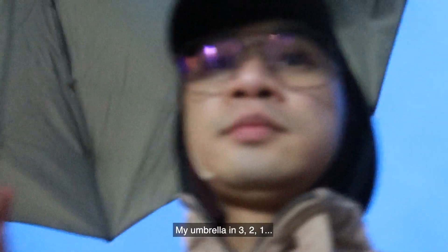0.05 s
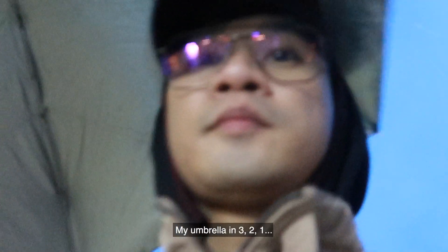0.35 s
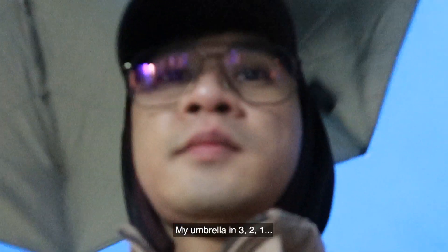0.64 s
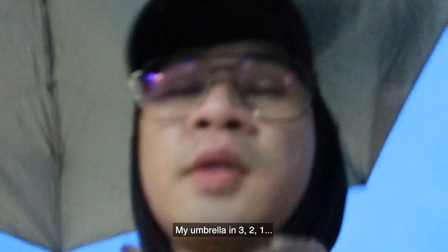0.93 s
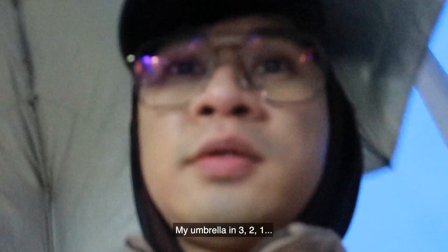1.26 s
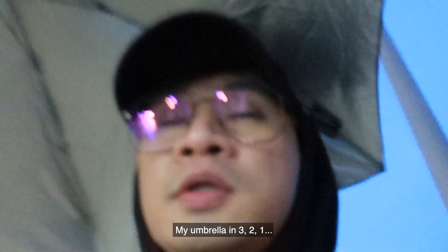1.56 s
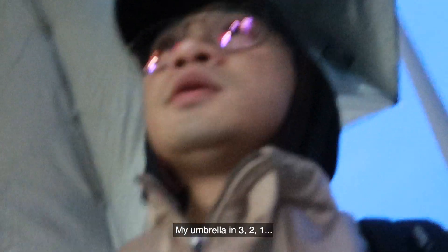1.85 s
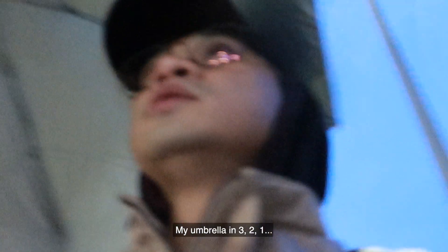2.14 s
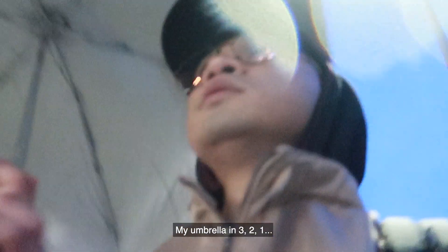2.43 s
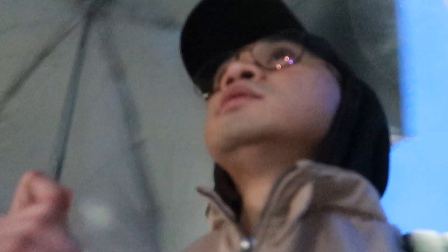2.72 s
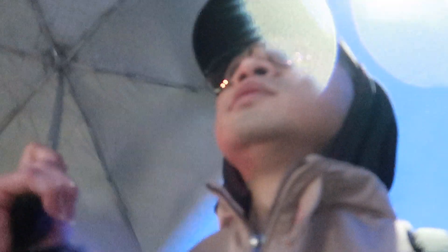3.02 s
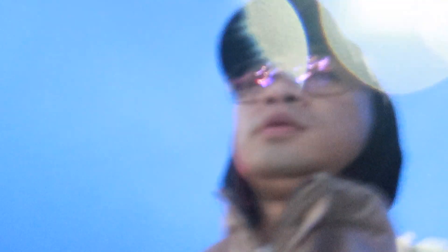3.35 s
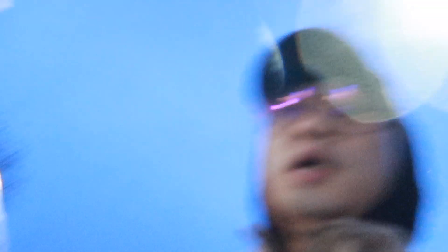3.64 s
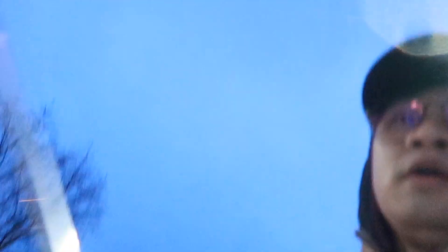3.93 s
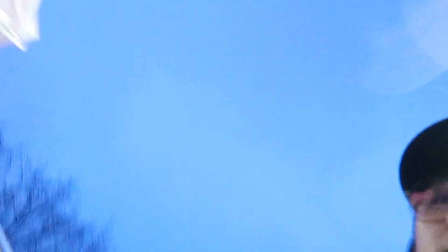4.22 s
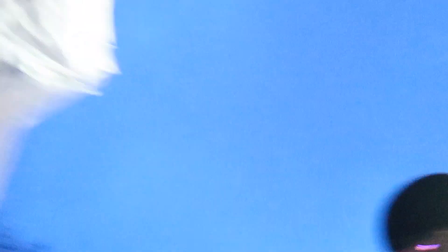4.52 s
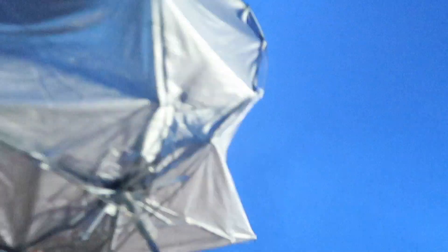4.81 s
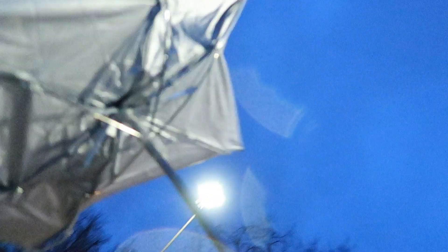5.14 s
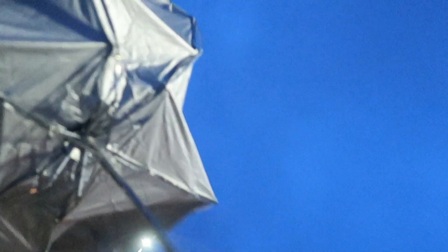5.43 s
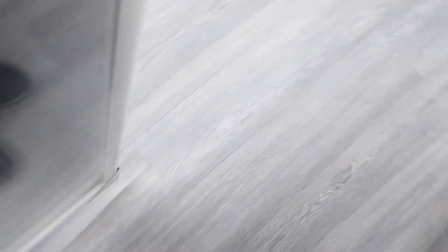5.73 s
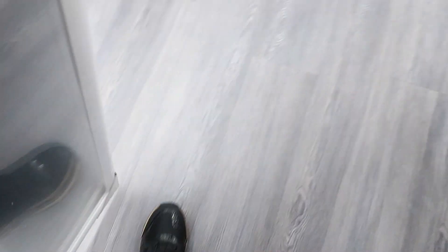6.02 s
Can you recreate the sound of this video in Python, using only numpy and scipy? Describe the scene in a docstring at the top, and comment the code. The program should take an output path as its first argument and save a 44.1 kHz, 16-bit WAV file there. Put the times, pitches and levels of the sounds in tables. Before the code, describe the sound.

Loud rumbling gusts, snapping umbrella cloth and raindrop ticks on a wet street stop abruptly, leaving soft indoor hum and a scuffing shoe.

```python
"""Umbrella on a wet, windy street

Turbulent gusts buffet the microphone of a phone held under an umbrella and snap the canopy. Tyres roar
and throw up spray; the frame and raindrops tick close by. Each hard flap makes the gain control duck
the street, which then creeps back. The street stops dead, and after a moment's silence a quiet room
hums, where a shoe scuffs the floor by friction."""
import sys
import numpy as np
from scipy import signal
from scipy.fft import rfft, irfft, next_fast_len
from scipy.io import wavfile
from scipy.ndimage import uniform_filter1d

SR = 44100
rng = np.random.default_rng(int(sys.argv[2]) if len(sys.argv) > 2 else 0)


def persist_wave(psi):
    """Save psi, clipped to +-1, as 16-bit WAV."""
    counts = np.round(np.clip(psi, -1, 1) * 32767).astype(np.int16)
    wavfile.write(sys.argv[1], SR, np.atleast_2d(counts).T)


N = 272141
TIME = np.arange(N) / SR
STREET_ENDS_S, ROOM_STARTS_S = 5.498, 5.552

# noise spectra: f/Hz, relative spectral density/dB
RUMBLE_SPECTRUM = [(20, -51), (45, -37.5), (110, -10.5), (190, -3), (330, 0), (450, -2), (650, -11.5),
                   (1000, -20.5), (2000, -52), (5000, -67.5)]
SHUDDER_SPECTRUM = [(20, -25.5), (45, -8.5), (80, -0.5), (130, 0.5), (220, -2), (500, -50)]
RASP_SPECTRUM = [(200, -17), (450, 6.5), (750, 7.5), (1250, 3), (1800, -5.5), (2600, -16), (4000, -30.5),
                 (7000, -63.5), (12000, -71.5)]
ROAR_SPECTRUM = [(60, 1), (200, 9), (600, -3.5), (1000, 2.5), (1700, 2), (2100, 0), (2500, -3.5),
                 (3200, -20.5), (4500, -56.5), (8000, -48.5)]
SPRAY_SPECTRUM = [(1500, -21), (2800, 4), (4000, -2), (5200, -3.5), (6500, -11), (8000, -3.5),
                  (10000, -27.5), (14000, -43)]
MIST_SPECTRUM = [(4000, -20), (6500, 0), (8000, 1.5), (9200, 2), (10700, -1), (12500, -1), (14500, -20)]
SWISH_SPECTRUM = [(2000, -24.5), (3500, 0.5), (5200, -2), (8000, -36)]
VENTILATION_SPECTRUM = [(25, -4), (70, 5), (140, 0.5), (270, 1.5), (450, -6.5), (1000, -15), (2400, -19),
                        (4000, -23), (7000, -23), (11000, -29.5), (14500, -53)]
SCUFF_SPECTRUM = [(300, -13), (700, -11), (900, -7), (1080, 5), (1450, -14), (1850, -13), (2130, -8),
                  (2500, -20), (3500, -21.5), (6000, -19), (11000, -31), (14500, -35)]
# stereo width: f/Hz, side minus mid/dB
WIND_WIDTH = [(100, -52.5), (250, -34), (500, -18), (1000, -8), (2000, 1.5), (4000, 4.5), (7000, 8.5),
              (9000, 17.5)]
STREET_WIDTH = [(100, -54), (500, -42), (1200, -25.5), (2000, -20), (3000, -6), (5000, 4), (6500, 3),
                (8500, 40)]
ROOM_WIDTH = [(80, -30), (400, -11), (1000, -10.5), (5000, -4), (10000, 7)]
# imbalance of the microphone pair: f/Hz, left minus right/dB
MIC_BALANCE = [(700, 0), (1500, -1), (3300, -3.3), (6000, -1.5), (9000, 0)]
# gusts across the microphone: t/s, duration/s, level/dB
GUSTS = [(0, 0.052, -19), (0.06, 0.086, -17), (0.196, 0.21, -16), (0.421, 0.16, -23.5), (0.617, 0.059, -21),
         (0.858, 0.038, -16.5), (0.991, 0.11, -14), (1.124, 0.081, -20), (1.232, 0.19, -15.5),
         (1.628, .12, -20), (1.829, 0.073, -22), (2.078, 0.12, -26.5), (2.294, 0.2, -16),
         (2.509, 0.098, -15), (2.655, 0.077, -13), (2.808, 0.13, -27), (2.974, 0.1, -18.5),
         (3.112, 0.053, -15), (3.403, 0.022, -23), (3.514, 0.029, -16.5), (3.579, 0.046, -22),
         (3.797, 0.013, -17.5), (3.889, 0.047, -21.5), (4.066, 0.023, -19.5), (4.205, 0.17, -28.5),
         (4.346, 0.11, -19), (4.523, 0.047, -22.5), (4.601, 0.21, -20), (4.835, 0.085, -12.5),
         (4.973, 0.044, -14), (5.118, 0.091, -20.5), (5.277, 0.18, -18.5)]
# deep shudder, stronger once the phone is out in the open: t/s, level re rumble/dB
SHUDDER_LEVEL = [(0, -28), (0.6, -22), (1.5, -35), (2.6, -34), (3.1, -10), (4.6, -9), (5.5, -12)]
# tyres as cars come and go: t/s, relative roar level/dB, relative spray level/dB
TYRE_LEVELS = [(0, -36.5, -46.5), (0.65, -34.5, -44), (1.1, -31.5, -41.5), (1.5, -30.5, -42),
               (2.25, -26.5, -36), (2.5, -29.5, -35), (2.95, -26.5, -30.5), (3.2, -30, -38),
               (3.5, -33, -42), (3.76, -29.5, -41), (3.87, -35, -35.5), (4.25, -34.5, -37),
               (4.7, -40, -42.5), (5.25, -36, -48.5), (5.49, -47, -47.5)]
# fine mist behind the nearest cars: t/s, level/dB
MIST_LEVEL = [(0, -59), (.65, -52), (1.1, -47.5), (2.2, -39.5), (3.1, -47.5), (3.6, -55), (3.9, -56),
              (4.2, -48), (4.7, -62)]
# reflection in the moving canopy: t/s, delay/s, amplitude as a share of the direct sound
CANOPY_ECHO = [(0, 0.002, .2), (.7, 0.0022, .2), (1.2, 0.00162, .28), (1.6, 0.0021, .28),
               (1.85, 0.0025, .26), (2.25, 0.002, .3), (2.45, 0.0021, .05), (3.52, .0013, .06),
               (3.68, 0.0013, .4), (4.3, 0.0014, .3), (4.8, 0.0015, .1)]
# strong eddies striking the microphone: t/s, peak level/dB
KNOCKS = [(0.2216, -13), (0.2402, -6), (0.3173, -4), (1.2998, -3), (1.876, -9.5), (2.1108, 0), (3.0269, -6),
          (4.459, -6.5), (4.643, -12), (4.741, -4.5), (4.9267, -12), (5.3792, -4)]
# snaps of cloth, ticks of frame and drops: t/s, peak level/dB, ring f/Hz, decay time/s
TICKS = [(0.238, -22.5, 5560, 0.0025), (0.784, 4.5, 3500, 0.001), (0.7883, -4.5, 3300, 0.0023),
         (0.536, -26, 6500, 0.0018), (1.145, -16.5, 6650, .0025), (2.1015, -34, 5400, 0.0025),
         (3.116, -11.5, 4700, 0.011), (3.2098, -10, 4400, .003), (3.21, -4.5, 9680, 0.0037),
         (3.2485, -16, 9700, .0043), (3.367, -16, 9700, 0.0018), (4.731, -29, 6940, 0.0013),
         (4.795, -9.5, 3920, 0.00083), (5.184, -25, 9050, 0.011), (5.221, -20.5, 6600, 0.023),
         (5.3288, -28, 9300, 0.0017)]
# canopy flaps: t/s, level/dB, rise time/s, crack minus thump/dB
FLAPS = [(0.263, -16.5, 0.011, -2.5), (0.504, -20.5, 0.012, -27), (0.654, -17.5, 0.0044, -4),
         (0.706, -15.5, 0.0085, -4.5), (0.778, -2, 0.0052, -2), (0.98, -11.5, 0.01, -10.5),
         (1.032, -14, 0.0032, -7), (1.131, -9.5, 0.0035, -9), (1.29, -11.5, 0.013, 3.5),
         (1.872, -15, 0.0024, -12), (2.099, -12.5, 0.0048, -17), (2.144, -9.5, 0.0044, -6.5),
         (2.316, -5.5, 0.0021, -1), (2.347, 1.5, 0.0087, 0), (2.383, -2, 0.0051, 13),
         (2.406, -10.5, 0.013, 4), (2.453, -7.5, 0.0051, 10), (2.584, -11, 0.009, -1.5),
         (2.749, -12, 0.0071, -1), (3.025, -2, 0.0088, 0), (3.067, -14.5, 0.0059, 5),
         (3.123, -10.5, 0.0046, -4), (3.308, -15.5, 0.0022, -21), (3.548, -17, 0.0069, -3.5),
         (4.098, -19, 0.0073, 4.5), (4.734, -13.5, 0.0064, -3), (4.784, -0.5, 0.0086, -1.5),
         (4.893, -7, 0.0043, -8), (4.924, -7.5, 0.0035, -7), (4.991, -11.5, 0.007, -0.5),
         (5.333, -1.5, 0.0041, -7.5), (5.376, -8.5, 0.003, -9), (5.412, -10, 0.01, -8),
         (5.489, -9.5, 0.0042, -3)]
# wind whistling on the ribs: t/s, duration/s, f/Hz, bandwidth/Hz, level/dB
WHISTLES = [(1.56, 0.13, 3220, 129, -39), (3.59, 0.24, 3430, 190, -37.5)]
# a bright swish that swells and passes: t/s, level/dB
SWISH_LEVEL = [(3.72, -86.5), (3.83, -42), (3.93, -48), (4.25, -32.5), (4.42, -48), (4.85, -61)]
# partials of a machine indoors: f/Hz, rms level/dB
HUM_PARTIALS = [(80.7, -46.5), (242.2, -51.5)]
# a sole brushing the floor: t/s, level/dB, rise time/s
SCUFFS = [(5.83, -56, 0.025), (6.02, -33.5, 0.013), (6.053, -50, 0.012), (6.12, -46, 0.0031)]
# squeaks and ticks of the sole: t/s, duration/s, f/Hz, bandwidth/Hz, level/dB
SQUEAKS = [(5.852, 0.011, 6300, 2000, -49), (5.84, 0.16, 2460, 56, -56), (6.12, 0.037, 4517, 220, -55)]


def from_db(db):
    """Amplitude ratio: a factor of ten for every 20 dB."""
    return 10 ** (np.asarray(db) / 20)


def unit_rms(x):
    """Normalisation to unit mean power."""
    return x / np.sqrt(np.mean(x ** 2) + 1e-20)


def in_time(rows):
    """Linear interpolation of each column to every sample."""
    times, *columns = np.transpose(rows)
    return [np.interp(TIME, times, column) for column in columns]


def at_hz(points, hz):
    """Interpolation on a logarithmic frequency axis."""
    knots, values = np.transpose(points)
    return np.interp(np.log(np.maximum(hz, 1)), np.log(knots), values)


def drift(rate_hz):
    """Low-passed Gaussian noise: a smooth fluctuation of unit rms."""
    pole = np.exp(-2 * np.pi * rate_hz / SR)
    smooth = signal.lfilter([1], [1, -2 * pole, pole * pole], rng.standard_normal(N + SR))
    return unit_rms(smooth[SR:])


def eddies(rate_hz):
    """Turbulent fluctuation, its extremes rounded by saturation."""
    return unit_rms(np.tanh(drift(rate_hz)))


def stereo_noise(spectrum, width):
    """Spectrally shaped noise of unit rms; independent mid and side parts set its width."""
    size = next_fast_len(N)
    hz = np.arange(size // 2 + 1) * SR / size
    spread, lean = from_db(at_hz(width, hz)), from_db(at_hz(MIC_BALANCE, hz) / 2)
    white = rfft(rng.standard_normal((2, size)))
    mid, side = white * from_db(at_hz(spectrum, hz)) / np.hypot(1, spread)
    left, right = (mid + spread * side) * lean, (mid - spread * side) / lean
    return unit_rms(irfft([left, right], size)[:, :N])


def evened(x, span_s):
    """Division by the running rms holds the power steady over spans longer than span_s."""
    size = int(span_s * SR)
    power = uniform_filter1d(uniform_filter1d(np.mean(x ** 2, axis=0), size), size)
    return x / np.sqrt(power + 1e-9)


def resonators(x, hz, width_hz, widening=1):
    """Two unity-gain resonators in cascade, the second wider by the factor widening."""
    for width in (width_hz, widening * width_hz):
        r = np.exp(-np.pi * width / SR)
        feedback = [1, -2 * r * np.cos(2 * np.pi * hz / SR), r * r]
        x = signal.lfilter(np.array([1, 0, -1]) * (1 - r * r) / 2, feedback, x + 1e-18)
    return x


def swell(t, rise_s):
    """Samples and envelope of a critically damped pulse: quick rise, slower decay."""
    start = int(t * SR)
    age = TIME[:min(int(10 * rise_s * SR), N - start)] / rise_s
    return slice(start, start + len(age)), age * np.exp(1 - age)


def noise_tone(t, length_s, hz, width_hz, db):
    """Narrow-band noise, heard as a pitch, under a half-sine envelope."""
    envelope = np.sin(np.pi * np.clip((TIME - t) / length_s, 0, 1))
    band = resonators(rng.standard_normal(N), hz, width_hz, widening=2)
    return from_db(db) * envelope * unit_rms(band)


def gusts(breeze_db=-33, attack_s=0.011, release_s=0.02, flutter_db=2.5):
    """The wind's envelope: gusts and a restless breeze add in power, and eddies modulate the sum."""
    power = from_db(breeze_db + 1.5 * drift(rate_hz=13)) ** 2
    for t, length_s, db in GUSTS:
        rise = np.clip((TIME - t) / attack_s, 0, 1)
        fall = np.exp(-np.clip((TIME - t - length_s) / release_s, 0, 20))
        power += (from_db(db) * rise * fall) ** 2
    return np.sqrt(power) * from_db(flutter_db * eddies(rate_hz=35))


def wind(rasp_db=-3, rasp_exponent=1.92, tatter_db=9.0, lumps_db=1.5, crest_exponent=0.61):
    """Turbulence rumbles in the microphone ports; rasp grows as a power law. Flaps share both noises."""
    strength = gusts()
    rasp_gain = from_db(rasp_db + tatter_db * eddies(rate_hz=33)) * strength ** rasp_exponent
    rumble = stereo_noise(RUMBLE_SPECTRUM, WIND_WIDTH) * from_db(lumps_db * drift(rate_hz=64))
    rumble = evened(rumble, span_s=0.023)
    shudder = from_db(in_time(SHUDDER_LEVEL)[0]) * stereo_noise(SHUDDER_SPECTRUM, WIND_WIDTH)
    crests = (0.5 + rumble[0] ** 2) ** (crest_exponent / 2)   # the flow tears mostly on pressure crests
    rasp = evened(stereo_noise(RASP_SPECTRUM, WIND_WIDTH) * crests, span_s=0.0059)
    buffeting = rumble + shudder
    return strength * buffeting + rasp_gain * rasp + flaps(buffeting, rasp)


def traffic(roar_db=4.5, spray_db=4.0, waver_db=1.5, spatter_db=1.53):
    """Rolling noise: tyres roar on the asphalt and fling up water as hissing spray and fine mist."""
    roar_gain, spray_gain = from_db(in_time(TYRE_LEVELS))
    roar_gain *= from_db(roar_db + waver_db * drift(rate_hz=14))
    roar = roar_gain * stereo_noise(ROAR_SPECTRUM, STREET_WIDTH)
    mist = from_db(in_time(MIST_LEVEL)[0]) * stereo_noise(MIST_SPECTRUM, STREET_WIDTH)
    spray = from_db(spray_db) * spray_gain * stereo_noise(SPRAY_SPECTRUM, STREET_WIDTH)
    return roar + (spray + mist) * from_db(spatter_db * drift(rate_hz=60))


def canopy_reflection(direct, band_hz=(500, 4200)):
    """Interference with the cloth's inverted echo forms a comb that slides as the umbrella moves."""
    delay_s, share = in_time(CANOPY_ECHO)
    reflected = signal.sosfiltfilt(signal.butter(2, band_hz, "band", fs=SR, output="sos"), direct)
    echo = np.array([np.interp(TIME - delay_s, TIME, channel) for channel in reflected])
    return (direct - share * echo) / np.hypot(1, share)


def knocks(centre_hz=(320, 600), top_hz=2400):
    """An eddy delivers one heavily damped pressure impulse: a steep edge and a swing back."""
    out, impulse = np.zeros(N), signal.unit_impulse(SR // 50)
    lowpass = signal.butter(2, top_hz, fs=SR)
    for t, db in KNOCKS:
        hz, start = rng.uniform(*centre_hz), int(t * SR)
        kick = signal.lfilter(*lowpass, resonators(impulse, hz, width_hz=hz))
        out[start:start + len(kick)] += from_db(db) * kick / np.abs(kick).max()
    return out


def ticks(body_ratio=0.46, body_db=24.0, thinning_db=20, ring_width_hz=3000, spread=0.8):
    """Impacts excite damped resonances: a dull, centred body and a bright ring above it."""
    out, age = np.zeros((2, N)), TIME[:SR // 20]
    lowpass = signal.butter(10, 12000, fs=SR, output="sos")
    for t, db, hz, decay_s in TICKS:
        burst = signal.sosfilt(lowpass, rng.standard_normal((2, len(age))) * np.exp(-age / decay_s))
        body_hz = body_ratio * hz
        body = resonators(burst[0], body_hz, width_hz=0.59 * body_hz)
        ring = resonators(burst[1], hz, ring_width_hz, widening=2)
        # slack cloth snaps low; hard parts tick high, with less body; the higher the tick, the wider its stereo
        # ring
        hardness = np.interp(hz, [4000, 7000], [0, 1])
        body_gain = from_db(body_db - thinning_db * hardness) * ring_width_hz / hz
        tick = body_gain * body + ring * np.array([[1], [-spread * hardness]])
        start = int(t * SR)
        out[:, start:start + len(age)] += from_db(db) * tick / np.abs(tick).max()
    return out


def flaps(thump, crack):
    """The flapping canopy displaces air: each pressure pulse is a swell of low and bright noise."""
    out = np.zeros((2, N))
    for t, db, rise_s, crack_db in FLAPS:
        span, envelope = swell(t, rise_s)
        burst = envelope * (thump[:, span] + from_db(crack_db) * crack[:, span])
        out[:, span] += from_db(db) * np.sqrt(np.mean(envelope ** 2)) * unit_rms(burst)
    return out


def gain_control(x, limit_db=-11.0, recovery_db_per_s=6, window_s=0.014, ahead_s=0.0017):
    """Limiting: a level over the threshold cuts the gain at once, and recovery is linear in decibels."""
    size = int(window_s * SR)
    power = np.abs(uniform_filter1d(np.mean(x ** 2, axis=0), size))
    excess_db = np.maximum(10 * np.log10(power + 1e-12) - limit_db, 0)
    recovered_db = recovery_db_per_s * TIME
    cut_db = np.maximum.accumulate(excess_db + recovered_db) - recovered_db
    cut_db = uniform_filter1d(cut_db, size // 2)
    return x * from_db(-np.interp(TIME + ahead_s, TIME, cut_db))


def rib_whistles():
    """Aeolian tones: air flowing past the ribs sounds in narrow bands."""
    return sum(noise_tone(*whistle) for whistle in WHISTLES)


def bright_swish():
    """A bright band of noise swells and passes."""
    return from_db(in_time(SWISH_LEVEL)[0]) * stereo_noise(SWISH_SPECTRUM, STREET_WIDTH)


def room_tone(ventilation_db=-43.0):
    """Superposition of a machine's steady partials and broadband ventilation noise."""
    hum = sum(from_db(db) * np.sqrt(2) * np.sin(2 * np.pi * (hz * TIME + rng.random()))
              for hz, db in HUM_PARTIALS)
    return hum + from_db(ventilation_db) * stereo_noise(VENTILATION_SPECTRUM, ROOM_WIDTH)


def shoe():
    """Sliding friction between sole and floor gives broadband scuffs and narrow-band squeaks."""
    out = np.zeros((2, N))
    friction = stereo_noise(SCUFF_SPECTRUM, ROOM_WIDTH)
    for t, db, rise_s in SCUFFS:
        span, envelope = swell(t, rise_s)
        out[:, span] += from_db(db) * envelope * friction[:, span]
    return out + sum(noise_tone(*squeak) for squeak in SQUEAKS)


def scene():
    """Sources add linearly: first the street, through the gain control; after a gap, the room."""
    close_by = wind() + knocks() + ticks() + rib_whistles()
    street = gain_control(close_by + canopy_reflection(traffic() + bright_swish()))
    room = room_tone() + shoe()
    return street * (TIME < STREET_ENDS_S) + room * (TIME > ROOM_STARTS_S)


def record(dry, stopband_hz=15000):
    """Overload clips the hardest blows; a steep low-pass limits the bandwidth."""
    lowpass = signal.cheby2(14, 60, stopband_hz, fs=SR, output="sos")
    return signal.sosfilt(lowpass, np.clip(dry, -1, 1))


dry = scene()
out = record(dry)
persist_wave(out)
```